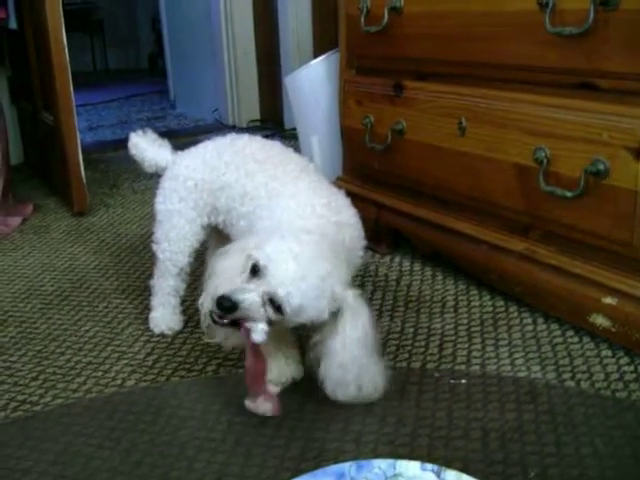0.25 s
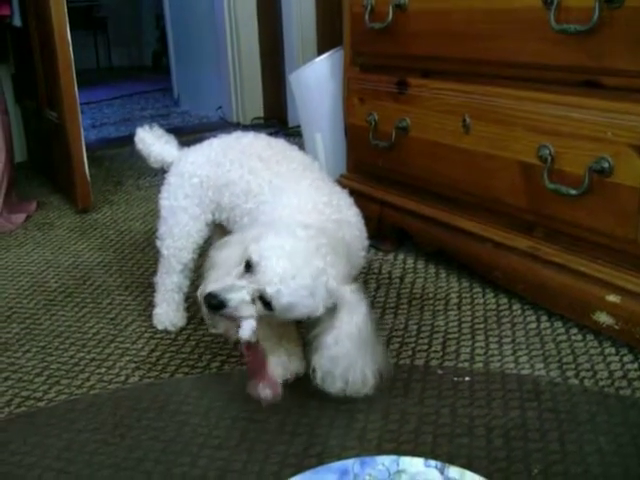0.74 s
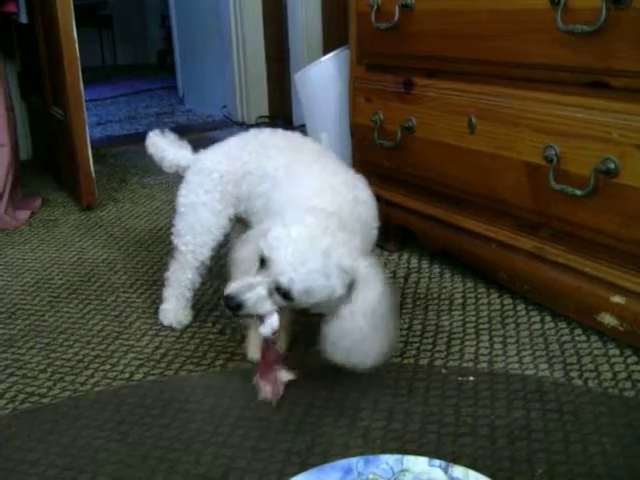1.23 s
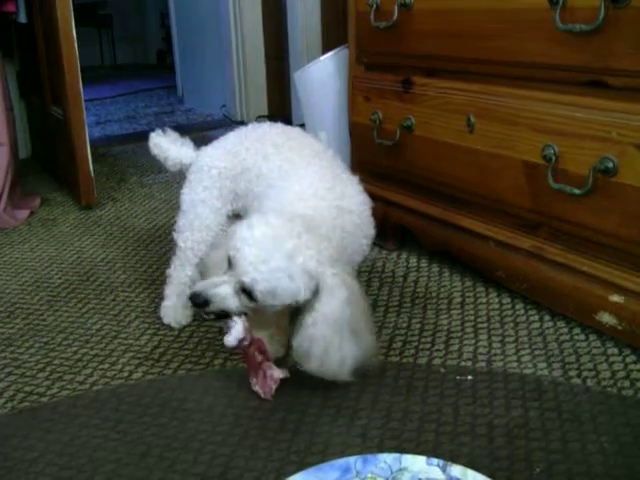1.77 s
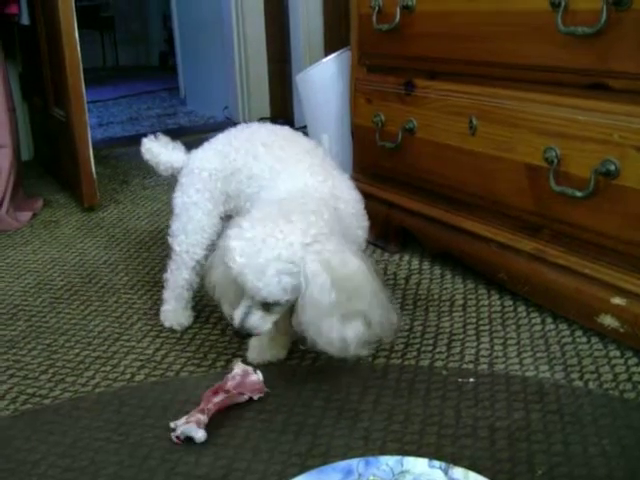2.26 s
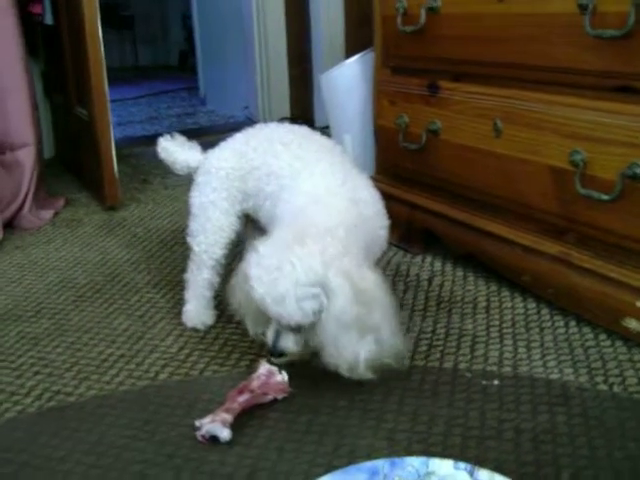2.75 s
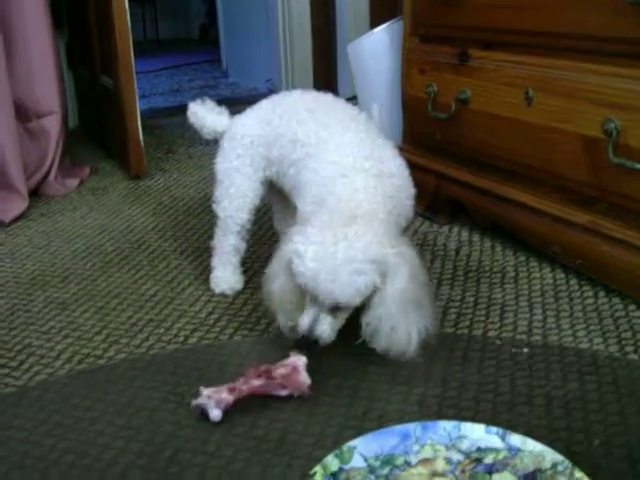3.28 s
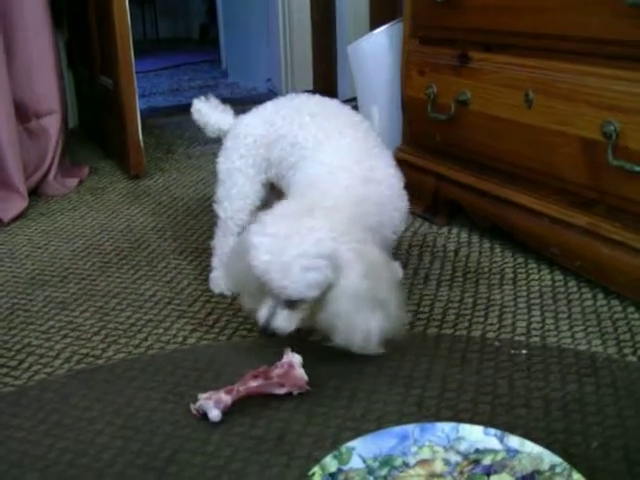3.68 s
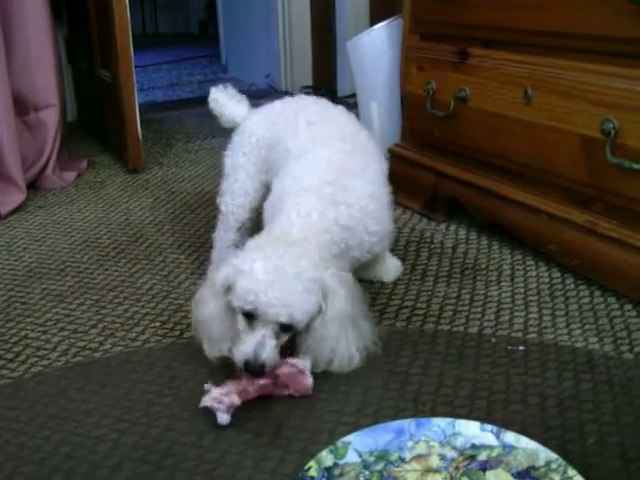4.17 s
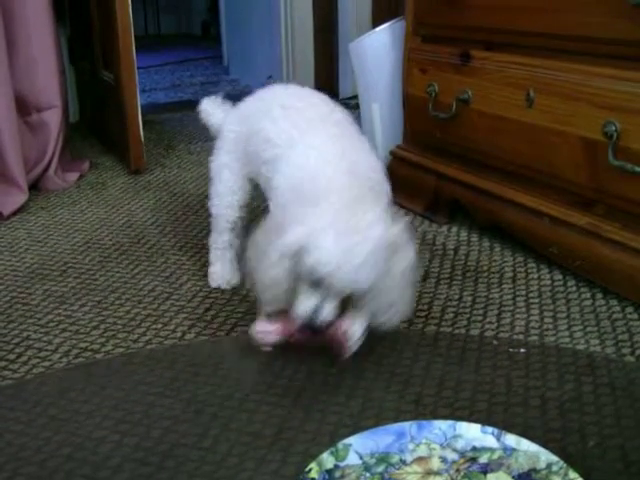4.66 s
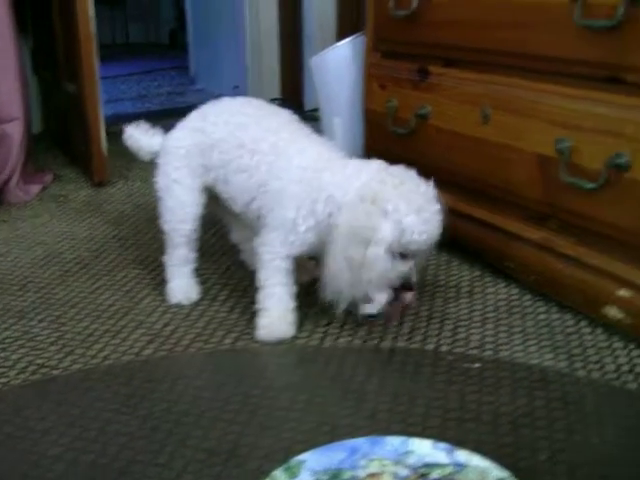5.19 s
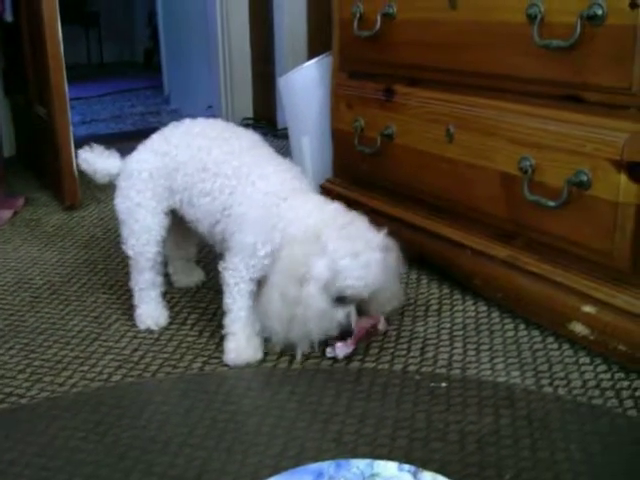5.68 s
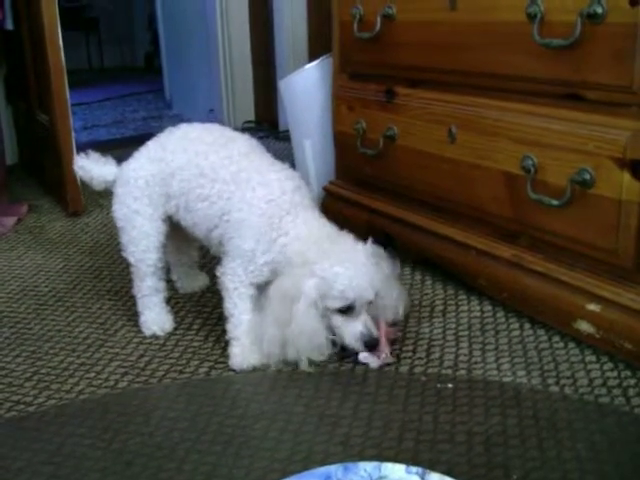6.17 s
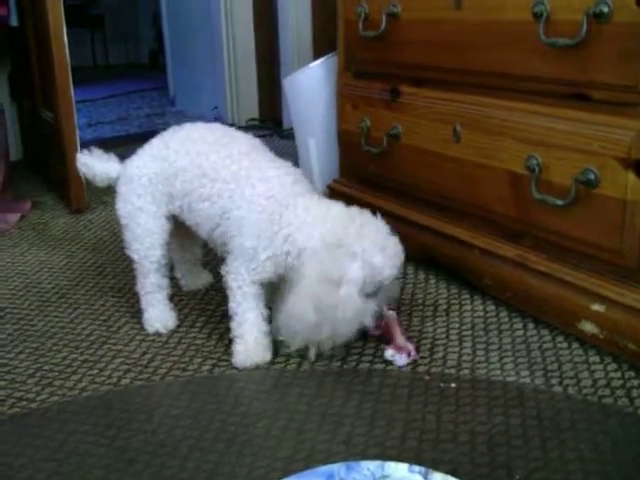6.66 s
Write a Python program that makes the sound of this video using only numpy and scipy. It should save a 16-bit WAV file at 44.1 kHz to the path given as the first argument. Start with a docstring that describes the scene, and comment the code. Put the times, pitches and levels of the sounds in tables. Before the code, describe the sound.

Close to a small dog chewing a raw bone on a carpeted floor indoors. Dry clicks and dull low thuds come irregularly; at two seconds the bone drops with a loud hard knock and brief room echo. Paws shuffle low and soft, another knock follows past three seconds, then sparser cracks. A cheap microphone lets hiss burst up with the sounds and sink to near silence.

```python
"""Small dog, raw bone

Carpeted floor indoors, one cheap camera microphone close to the dog, about seven seconds.
Teeth and knocking bone crack and thud: a short pressure spike, then a slow swing. Knocks also ring:
a half-cycle contact, damped sines and a room echo. Paws shuffle as swelling low noise.
Room hiss, hum and rumble jump up at listed moments, hold and sink to a faint hiss.
A coarse converter at half the rate makes the quietest sound flip between steps."""
import sys
import numpy as np
from scipy import signal
from scipy.fft import rfft, irfft, next_fast_len
from scipy.io import wavfile
from scipy.ndimage import map_coordinates

SR = 44100
rng = np.random.default_rng(int(sys.argv[2]) if len(sys.argv) > 2 else 0)


def to_wav(s):
    """Save 16-bit WAV."""
    ch = np.atleast_2d(s).T  # columns
    pcm = np.round(np.clip(ch, -1, 1) * 32767)  # PCM
    wavfile.write(sys.argv[1], SR, pcm.astype(np.int16))


N = 305613  # length in samples

# Spans with the room noise up: [from t/s, to t/s]
NOISE_UP_SPANS = [(-.1, .112), (.2568, .36), (.4584, .612), (.926, 1.036), (1.174, 1.366), (1.451, 1.536),
                  (1.716, 1.882), (1.921, 2.566), (3.2506, 3.502), (3.837, 3.932), (4.078, 4.21),
                  (4.987, 5.146), (5.198, 5.23), (5.429, 5.52), (5.813, 5.975), (6.288, 6.386)]
# Paws on the floor: [start t/s, peak t/s, end t/s, strength/dB]
# An end ahead of the peak cuts the swell off there; an end ahead of the start leaves it silent.
PAW_SHUFFLES = [(-.1, 0.02, 0.13, 3.5), (1.897, 1.942, 1.96, 8), (2, 2.12, 2.1, 13),
                (2.132, 2.24, 2.33, 15), (2.22, 2.331, 2.44, 18), (2.437, 2.529, 2.68, 5.5),
                (3.227, 3.3, 3.37, 16.5), (4.05, 4.122, 2.3, 3.5), (5.176, 5.204, 5.15, 5)]
# Noise colours, relative density: [f/Hz, level/dB per Hz]
FAINT_SPECTRUM = [(15, -36.5), (25, 0), (32, -3.5), (59, -5), (101, -20.5), (420, -20.5), (466, -26.5),
                  (653, -23.5), (783, -18.5), (1180, -26), (7450, -23.5), (11000, -26)]
HISS_SPECTRUM = [(880, -50.5), (1500, -8.5), (1820, 2), (2300, 0), (3480, -0.5), (7070, -0.5), (9700, 0),
                 (11000, -1.5)]
HUM_SPECTRUM = [(120, -22.5), (200, -5), (400, -6.5), (650, -10.5), (760, -8), (840, -1), (930, -10),
                (1100, -9.5), (1500, -13.5), (2500, -28)]
RUMBLE_SPECTRUM = [(12, 16.5), (30, 0.5), (70, -1.5), (100, -16), (150, -8.5), (300, -72.5)]
# Low resonance of the floor boards: [f/Hz, level/dB per Hz]
BOARD_SPECTRUM = [(25, -26.5), (45, -5), (68, 0.5), (90, -2.5), (130, -40.5)]
# Thin tones of the camera, louder while the room noise is up: [f/Hz, peak level/dB when up]
CAMERA_TONES = [(6002, -73), (10072, -68)]
# Cracks and thuds of teeth and of knocking bone:
# [t/s, crack level/dB, crack decay/ms, thud level/dB, thud rise/ms, thud swing f/Hz]
CRACK_THUD_EVENTS = [(.2568, -22.5, 0.14, -20, 1.6, 9.1), (.4584, -30, 0.25, -21.5, 0.77, 9),
                     (0.9263, -30.5, 0.69, -28.5, 5.3, 13.3), (1.1753, -45.5, 0.67, -40.5, 1.1, 25),
                     (1.225, -60, 0.19, -25, 2.1, 9.8), (1.4518, -38, 0.086, -34, 2.7, 22),
                     (1.7166, -23.5, 0.11, -23, 0.71, 8.5), (2.0014, -9, 0.18, -35, 1.7, 8),
                     (2.4004, -17, .031, -23, 0.82, 6.6), (3.2506, -14, 0.012, -40, 0.45, 11.4),
                     (3.369, -15.5, 0.022, -24, 0.64, 7.5), (3.8371, -41, 0.088, -28.5, 2.6, 12),
                     (4.0779, -28, 0.2, -23, 1.06, 8.8), (4.9871, -9.5, 0.02, -27, .15, 6.4),
                     (5.198, -54, 0.33, -35, 3, 7.5), (5.432, -35.5, 0.061, -47.5, 3.3, 3.42),
                     (5.8132, -20, 0.078, -22, 1.15, 6.45), (6.2884, -24, 0.24, -22, 1.86, 8.4)]
# Bone on floor or teeth: [t/s, contact level/dB, contact f/Hz, ring level/dB,
#   f/Hz damped at the struck spot, echo level/dB re the knock, slow pull level/dB]
KNOCK_EVENTS = [(1.2087, -33, 250, -54, 800, -14, -49), (1.217, -35, 181, -57, 800, -13, -50),
                (1.223, -44.5, 151.4, -47, 800, -16, -50), (2.0013, -11.5, 614, -7.5, 1380, -11, -28),
                (3.2505, -24.5, 628, -16, 790, -14, -29.5), (4.987, -46, 827, -23, 542, -8.5, -35.5)]
# Ringing pitches of a knock, as the bone and its close reflection sound together: [f/Hz]
RING_HZ = [75, 150, 300, 363, 560, 767, 1012, 1253, 1770, 1980, 2875, 3070, 4500]
# One row for each ringing pitch: [relative level/dB, t60/s]
RING_LEVEL_DECAY = [(-2, 0.13), (-8.5, 0.057), (-14.5, 0.08), (-1.5, 0.039), (-6.5, 0.022), (-6.5, 0.024),
                    (-11, 0.0261), (-24.5, 0.011), (-13.5, 0.035), (-22, 0.019), (-19, 0.035), (-14, 0.024),
                    (-11.5, 0.0093)]
# Decay of the room echo: [f/Hz, t60/s]
ROOM_DECAY = [(150, 0.3), (800, 0.17), (1800, 0.18), (3000, 0.13), (9000, 0.11)]
# Response after the converter: [f/Hz, level/dB]
SMOOTHING_RESPONSE = [(9800, 0.5), (10500, -1), (11025, -4.5), (11600, -12.5), (12300, -36)]

# Noise levels/dB with the room noise up and the paws at rest, ahead of the random wobble
HISS_DB, HUM_DB, RUMBLE_DB, BOOM_DB = -51.5, -56, -41, -55
HISS_GROWS, HUM_GROWS, RUMBLE_GROWS = 0.22, 0.44, 0.2924  # dB gained per dB of shuffle
LOWS_LINGER = 0.72  # exponent under 1: the lows sink more slowly than the hiss
OFFSET = 0.0062  # resting level of the signal, full scale = 1
ROUND = 1.1  # exponent over 1: the push starts softly
DAMPING = 2.37  # swing loss per cycle, natural-log units
SWELL, SHARP_MS = 2.55, 0.03  # after a crack this thin the push goes on swelling
PULL_S = 0.077  # decay time of the pull after a knock
STEP = 0.00138  # smallest step of the converter, full scale = 1
TOP_HZ = 12330  # upper band limit


def amp(db):
    """Gain of a level in dB."""
    return 10 ** (np.asarray(db) / 20)


def along(points, hz):
    """Reads (Hz, value) points on a log frequency axis."""
    f, value = np.transpose(points)
    return np.interp(np.log(hz + 1), np.log(f + 1), value)


def filtered(x, response):
    """Multiplies the spectrum of x by a response of frequency."""
    size = next_fast_len(N + SR)
    hz = np.fft.rfftfreq(size, 1 / SR)
    return irfft(rfft(x, size) * response(hz), size)[:N]


def noise(spectrum):
    """Coloured noise of rms 1."""
    x = filtered(rng.standard_normal(N), lambda hz: amp(along(spectrum, hz)))
    return x / np.std(x)


def wobble(rate):
    """A smooth random curve with rate knots a second."""
    knots = rng.standard_normal(int(N * rate / SR) + 4)
    return map_coordinates(knots, [np.arange(N) * rate / SR])


def add(track, s, sound):
    """Mixes a sound into the track from s seconds on."""
    track[round(s * SR):][:len(sound)] += sound


def faint():
    """The quiet noise that is always there, its rms under one step of the converter."""
    return amp(-66) * noise(FAINT_SPECTRUM)


def noise_up():
    """Envelope near 1 with the room noise up: a jump within about a millisecond, a fall over some 40 ms."""
    t = np.arange(N) / SR
    spans = []
    for start, end in NOISE_UP_SPANS:
        rise = 1 - np.exp(-np.maximum(t - start, 0) / 0.00051)
        fall = np.exp(-(np.maximum(t - end, 0) / 0.036) ** 0.97)
        spans.append(rise * fall)
    return np.max(spans, axis=0)


def paw_strength():
    """How hard the paws work, in dB: straight swells to a peak and fades, the strongest one counting."""
    t = np.arange(N) / SR
    swells = [np.interp(t, [start, peak, end], [0, db, 0]) for start, peak, end, db in PAW_SHUFFLES]
    return np.max(swells, axis=0)


def hiss(up, paws_db):
    """Bright room noise whose level flickers at two speeds and grows a little with the paws."""
    flicker_db = 1.1 * wobble(25) + 0.76 * wobble(7.8)
    return up * amp(HISS_DB + HISS_GROWS * paws_db + flicker_db) * noise(HISS_SPECTRUM)


def hum(up, paws_db):
    """The hum of the house, as unsteady mid-low noise."""
    return up * amp(HUM_DB + HUM_GROWS * paws_db + 1.8 * wobble(16)) * noise(HUM_SPECTRUM)


def rumble(up, paws_db):
    """Paws and jaws through the floor, as low noise that lingers as it sinks."""
    level = amp(RUMBLE_DB + RUMBLE_GROWS * paws_db + 1.7 * wobble(30))
    return up ** LOWS_LINGER * level * noise(RUMBLE_SPECTRUM)


def whine(up):
    """Thin sine tones of the camera, following the room noise down to a floor of 0.15."""
    t = np.arange(N) / SR
    tones = sum(amp(db) * np.sin(2 * np.pi * hz * t) for hz, db in CAMERA_TONES)
    return np.maximum(up, 0.15) * tones


def boom(up, paws_db):
    """Noise in the low resonance of the floor, as the dog steps about."""
    level = amp(BOOM_DB + paws_db + 2.02 * wobble(20))
    return up ** LOWS_LINGER * level * noise(BOARD_SPECTRUM)


def baseline(up):
    """The resting level jumps with the room noise, sags at each fall and creeps back."""
    def band(hz):
        creep = 1j * hz / (2.9 + 1j * hz)  # high-pass
        return creep / (1 + 1j * hz / 120)  # low-pass
    return OFFSET + 0.033 * filtered(up, band)


def cracks_and_thuds():
    """A short pull of pressure, then a push that swings out slowly at 3 to 25 Hz."""
    track, t = np.zeros(N + SR), np.arange(SR // 2) / SR
    lead = 0.002  # s, room for the crack to build up
    for s, crack_db, width_ms, thud_db, rise_ms, swing_hz in CRACK_THUD_EVENTS:
        crack = -amp(crack_db) * np.exp(-np.abs(t - lead) / (width_ms / 1000))
        since = np.maximum(t - lead, 0)
        turn = 2 * np.pi * swing_hz * since
        swell = SWELL * np.exp(-width_ms / SHARP_MS)
        swing = np.exp(-DAMPING * swing_hz * since) * (np.cos(turn) + swell * np.sin(turn))
        push = 1 - np.exp(-(since / (rise_ms / 1000)) ** ROUND)
        add(track, s - lead, crack + amp(thud_db) * push * swing)
    return track[:N]


def echo(x):
    """The room answers 3 ms later with a noise tail; each frequency dies at its own speed."""
    hz, t, z = signal.stft(rng.standard_normal(SR // 2), SR, nperseg=256)
    decay = amp(-60 * t / along(ROOM_DECAY, hz)[:, None])
    tail = signal.istft(z * decay, SR, nperseg=256)[1]
    delayed = np.pad(x, (round(0.003 * SR), 0))
    return signal.fftconvolve(delayed, tail / np.linalg.norm(tail))[:SR]


def apart(hz, from_hz):
    """Distance between two pitches, 0 where they meet."""
    return hz / from_hz - from_hz / hz


def knock_ring(since, contact_hz, damped_hz):
    """Damped sines, favoured near the contact's pitch and weakened near the damped one."""
    ring = np.zeros(len(since))
    scatters_db = rng.standard_normal(len(RING_LEVEL_DECAY))
    for hz, (level_db, t60), scatter_db in zip(RING_HZ, RING_LEVEL_DECAY, scatters_db):
        spot = np.tanh(3.1 * abs(apart(hz, damped_hz)) + 0.15)
        share = spot / np.hypot(1, apart(hz, contact_hz))
        decay = amp(level_db + scatter_db - 60 * since / t60)
        ring += share * decay * np.sin(2 * np.pi * hz * since)
    return ring


def knocks():
    """Half a cycle of contact; just past its deepest point the bone springs back and rings."""
    track, t = np.zeros(N + SR), np.arange(SR // 4) / SR
    for s, contact_db, contact_hz, ring_db, damped_hz, echo_db, pull_db in KNOCK_EVENTS:
        contact = -np.sin(2 * np.pi * contact_hz * t) * (t < 0.5 / contact_hz)
        since = np.maximum(t - 0.3 / contact_hz, 0)
        ring = knock_ring(since, contact_hz, damped_hz)
        knock = amp(contact_db) * contact + amp(ring_db) * ring
        pull = amp(pull_db) * (1 - np.exp(-t / 0.0028)) * np.exp(-t / PULL_S)
        add(track, s, knock - pull)
        add(track, s, amp(echo_db) * echo(knock))
    return track[:N]


def scene():
    """All sources at the one microphone."""
    up, paws_db = noise_up(), paw_strength()
    room = hiss(up, paws_db) + hum(up, paws_db) + rumble(up, paws_db) + whine(up)
    floor = boom(up, paws_db)
    return (faint() + room + floor + baseline(up) + cracks_and_thuds() + knocks())[None]


def record(dry):
    """A coarse converter at half the rate rounds to steps; then smoothing and the band limit."""
    halved = filtered(dry[0], lambda hz: hz < SR / 4)[::2]
    steps = np.zeros(N)
    steps[::2] = 2 * STEP * np.round(halved / STEP)  # 2 makes up for the zeros in between
    return filtered(steps, lambda hz: amp(along(SMOOTHING_RESPONSE, hz)) * (hz < TOP_HZ))[None]


dry = scene()
out = record(dry)
to_wav(out)
```